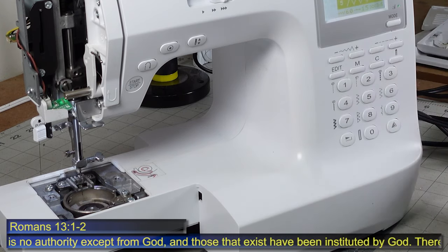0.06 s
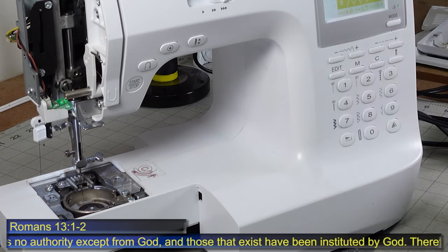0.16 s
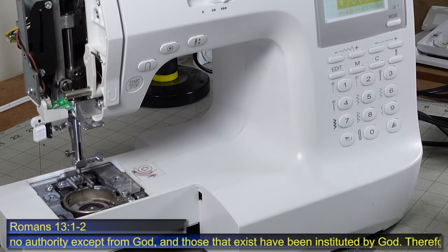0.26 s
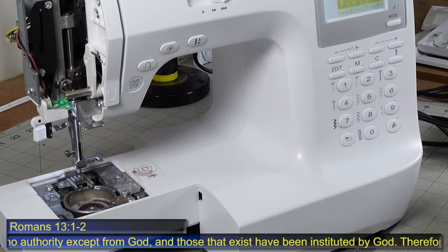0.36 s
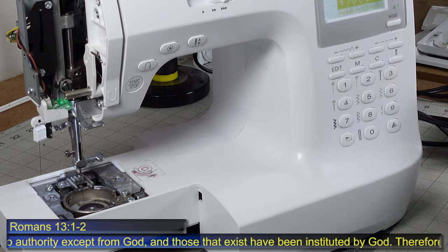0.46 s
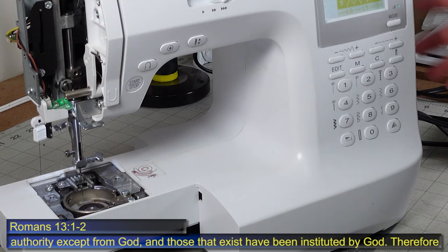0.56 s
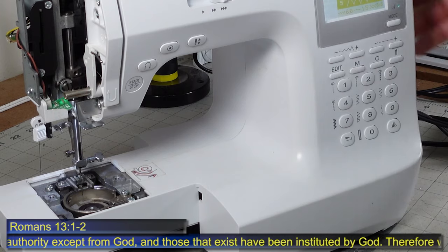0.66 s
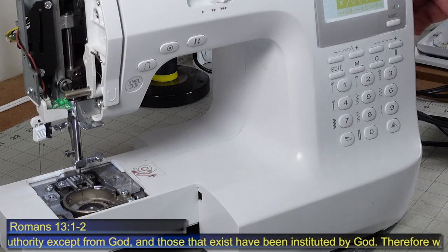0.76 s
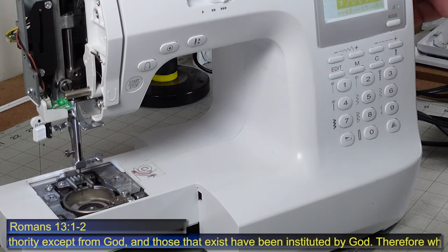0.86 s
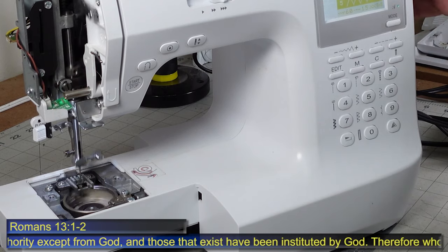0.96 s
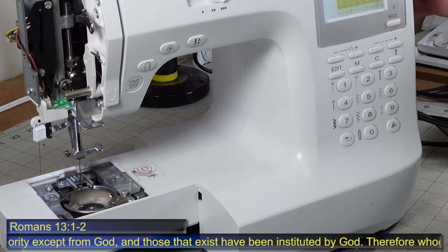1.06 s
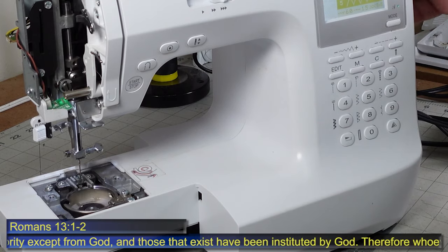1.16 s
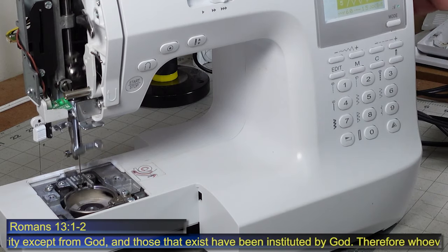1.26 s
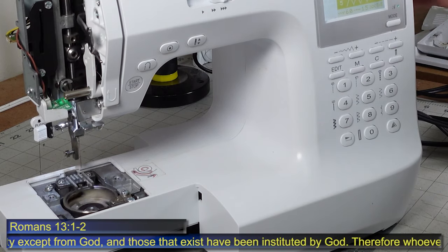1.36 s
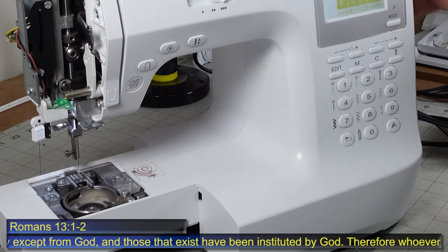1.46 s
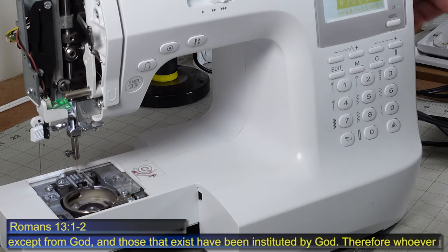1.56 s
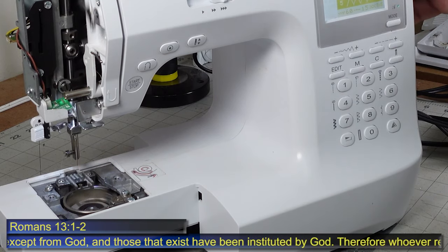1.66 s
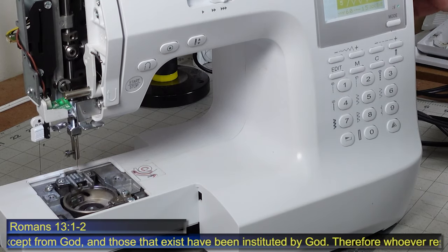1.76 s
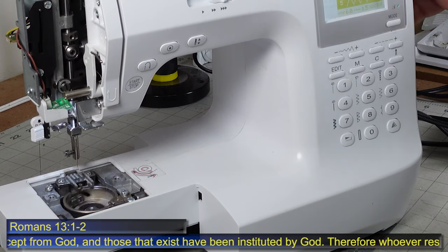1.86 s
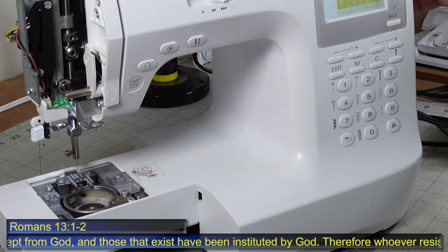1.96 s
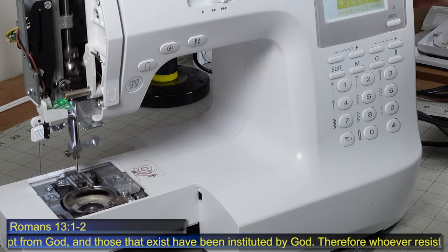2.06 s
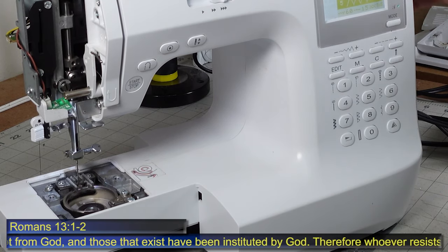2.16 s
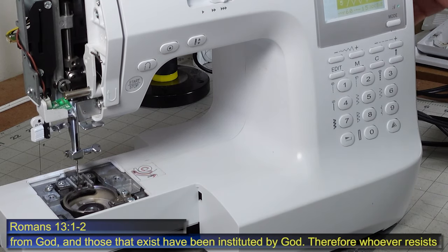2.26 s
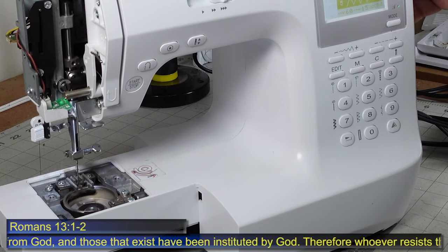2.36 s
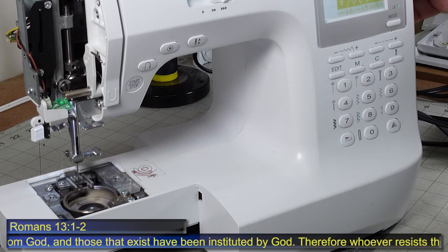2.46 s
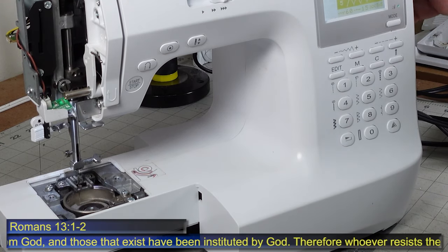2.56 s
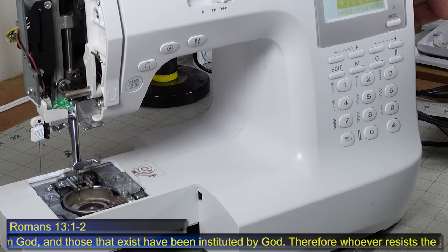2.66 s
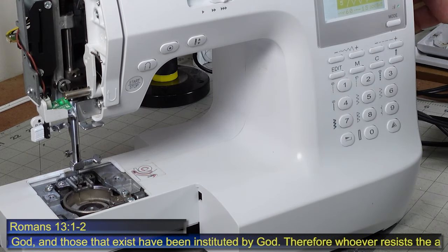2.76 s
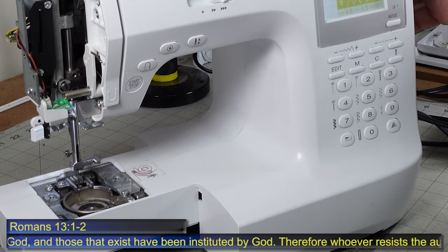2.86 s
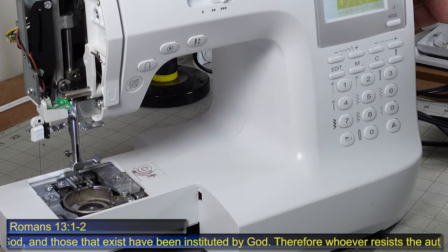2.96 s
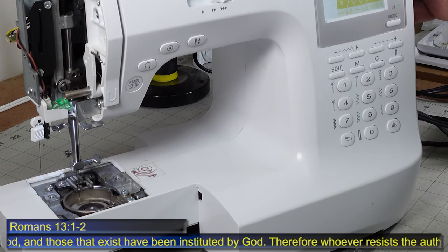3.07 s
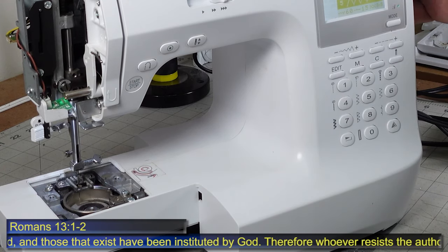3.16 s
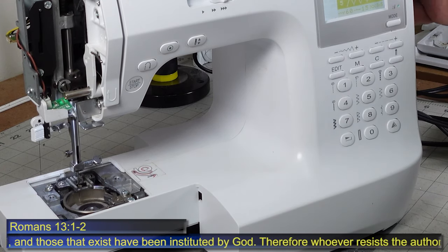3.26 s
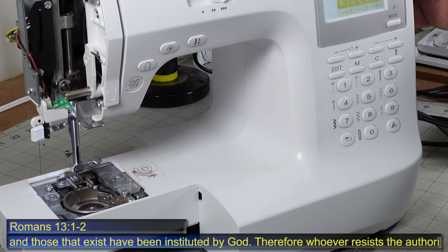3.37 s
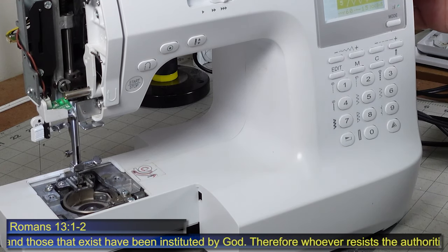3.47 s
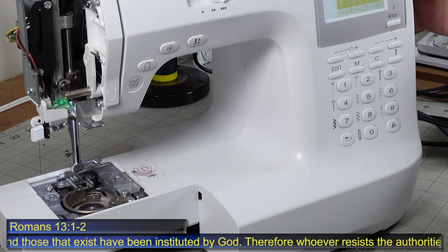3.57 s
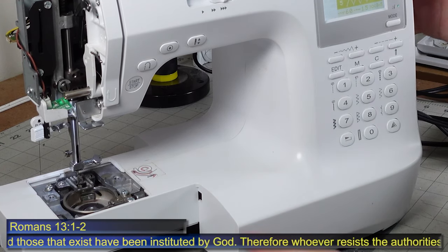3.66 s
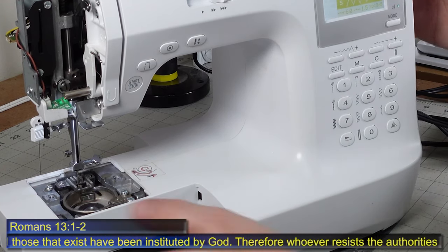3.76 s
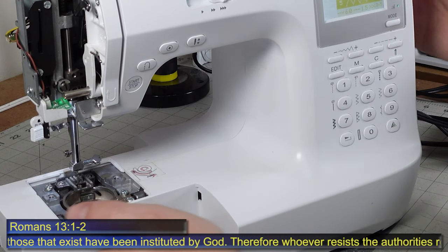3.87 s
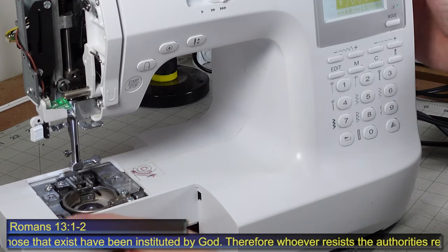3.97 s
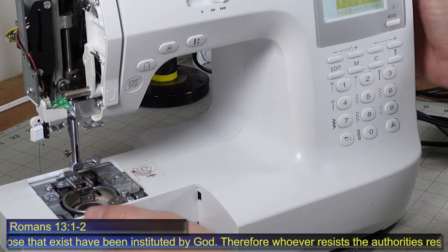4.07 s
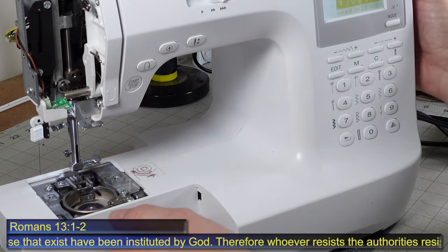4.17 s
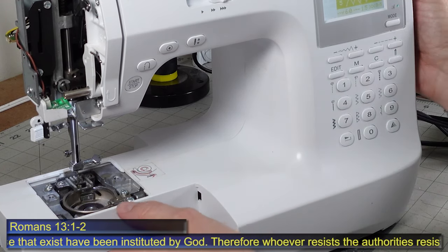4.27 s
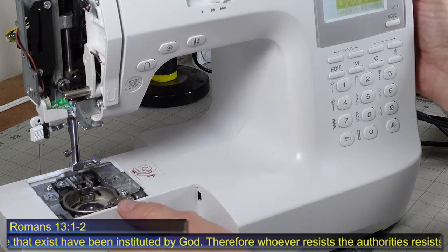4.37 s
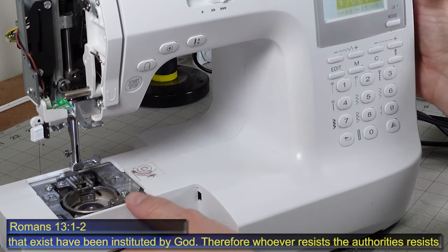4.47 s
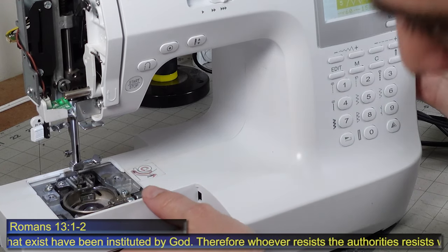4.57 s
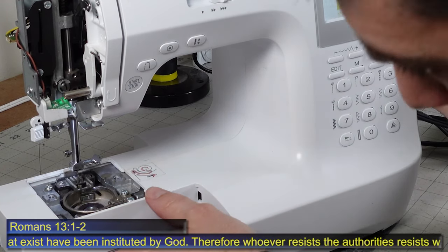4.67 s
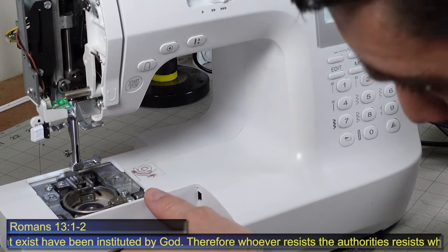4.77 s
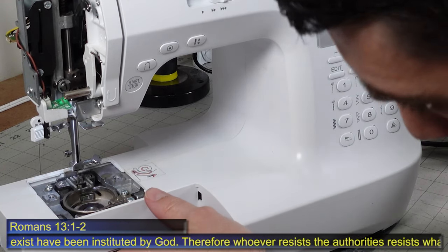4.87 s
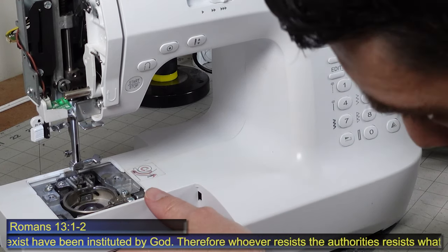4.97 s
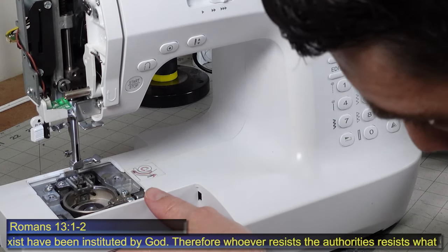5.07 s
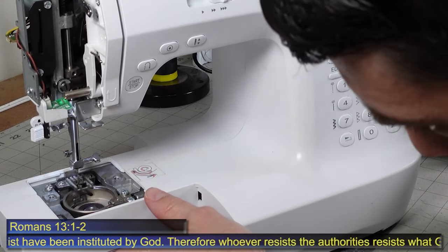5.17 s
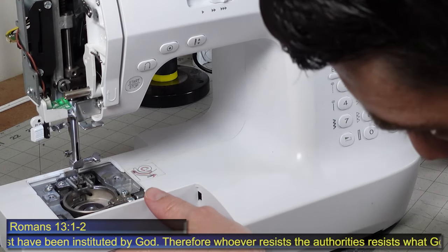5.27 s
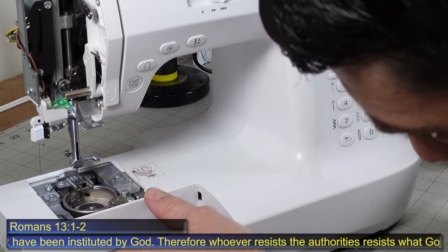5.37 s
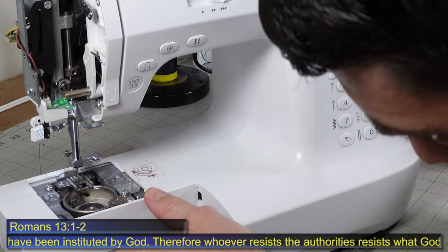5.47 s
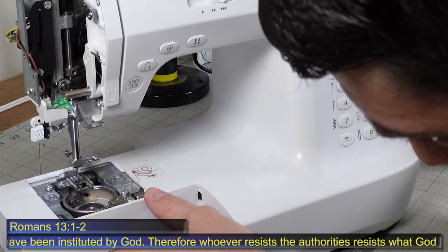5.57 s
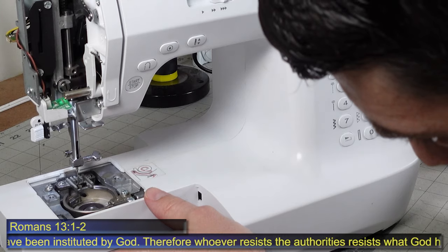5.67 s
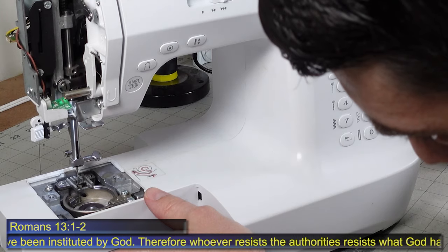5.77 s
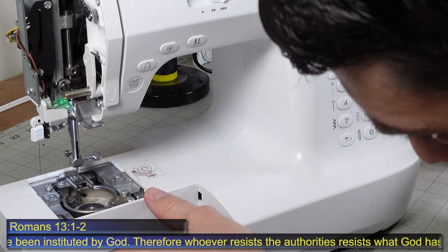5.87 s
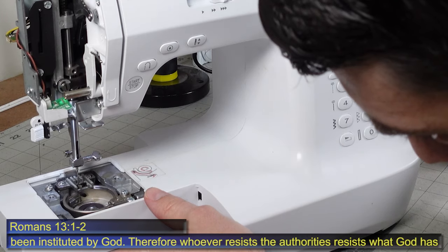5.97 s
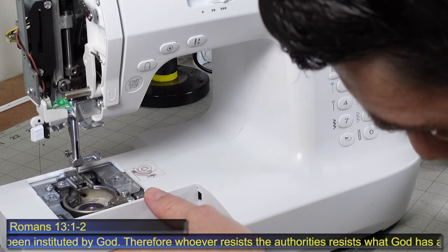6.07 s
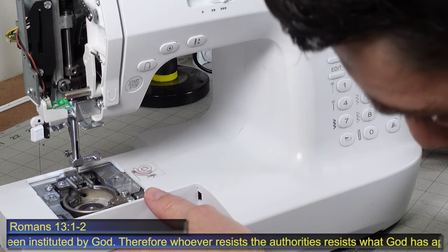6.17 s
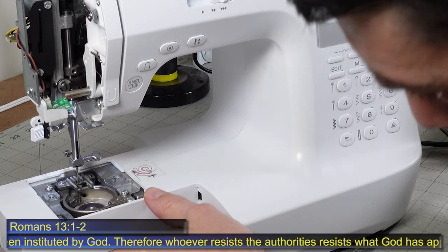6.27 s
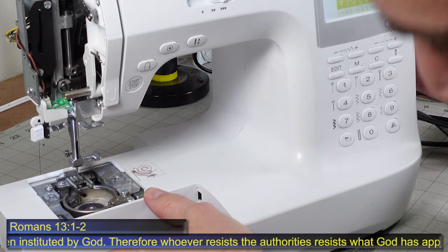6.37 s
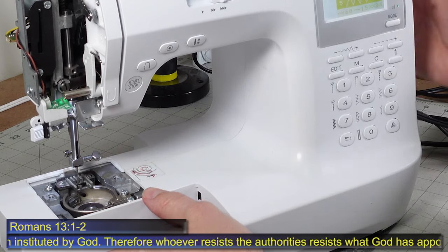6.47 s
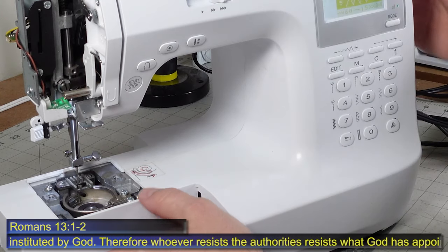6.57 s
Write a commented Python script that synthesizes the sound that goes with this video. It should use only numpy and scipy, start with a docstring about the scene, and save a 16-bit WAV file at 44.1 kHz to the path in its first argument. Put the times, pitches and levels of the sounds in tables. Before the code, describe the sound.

One close microphone, little room sound. Small metal parts click and rattle as shafts and gears are pushed round in jerks, the plastic casing resonating and the bench thumping softly. A sharp double click stands out midway. Later the handling turns to sparse dull knocks, cloth rustle and a short dry creak. Quiet room air and a faint low hum remain, ended by a blunt knock.

```python
"""Hand-turned sewing machine

A quiet workshop, one close microphone with little room in it: the handwheel of an open machine is turned by hand.
Grains of friction set the hollow casing, shafts and teeth ringing; a lever scrapes along its cam.
Clicks, knocks, ticks and a creaking joint are struck modes and dying noise, over friction in the bench.
Shaped noise makes a sleeve's rustle and the room air; sines make faint electric tones and a far low hum."""
import sys
import numpy as np
from scipy import signal
from scipy.io import wavfile

SR = 44100
rng = np.random.default_rng(int(sys.argv[2]) if len(sys.argv) > 2 else 0)


def log_audio(samples):
    """Write samples as a 16-bit WAV file to the path given in sys.argv[1]."""
    # one column per channel
    frames = np.atleast_2d(samples).T
    # limit to full scale, then quantise
    limited = np.clip(frames, -1, 1)
    pcm = np.round(limited * 32767).astype(np.int16)
    wavfile.write(sys.argv[1], SR, pcm)


def linear_from_db(decibels):
    """Turn decibels (scalar or array-like) into linear amplitude factors; 0 gives 1."""
    return 10 ** (np.asarray(decibels, float) / 20)


N = 291291

# Pushes on the wheel and jolts of the hand; the bench answers them too:
# (time of full force [s], hold [s], casing drone level [dB], shaft rub level [dB])
PUSHES = [(0.757, 0.023, -70, -75), (0.94, 0.0027, -50.5, -66), (1.015, 0.066, -49.5, -68),
          (1.082, 0.0042, -43, -60), (1.13, 0.0073, -47, -56.5), (1.308, 0.083, -45, -58),
          (1.41, 0.041, -43, -63), (1.486, 0.0044, -34, -49), (1.538, 0.053, -47, -57.5),
          (1.615, 0.0046, -42.5, -55.5), (1.691, 0.0092, -39.5, -56), (1.724, 0.0056, -43.5, -45.5),
          (1.781, 0.054, -47.5, -69), (1.85, 0.033, -45, -67), (2.042, .01, -54, -62),
          (2.063, 0.0054, -43, -56), (2.118, 0.076, -49.5, -60.5), (2.199, 0.0046, -49.5, -55),
          (2.491, 0.029, -51, -62), (2.577, 0.0087, -39, -48.5), (2.678, 0.018, -59, -62.5),
          (3.014, 0.0035, -67.5, -71), (3.182, .005, -55, -65.5), (3.361, 0.12, -58.5, -70),
          (3.5, 0.098, -60, -74), (3.628, .003, -45, -61), (3.723, 0.017, -54, -66),
          (3.852, 0.014, -56, -74), (4.031, 0.0044, -46, -48.5), (4.054, 0.072, -64.5, -64.5),
          (4.317, 0.08, -58, -72), (4.516, 0.0041, -68, -62), (4.524, 0.035, -59, -68),
          (4.612, .005, -38.5, -45.5), (4.694, 0.0041, -44.5, -53.5), (4.77, 0.15, -69, -75),
          (4.964, 0.0093, -54, -64), (6.44, 0.0029, -44.5, -48), (6.467, 0.009, -55.5, -67),
          (6.582, .02, -61, -72)]
# Resonances of the hollow casing: (frequency [Hz], width [Hz], level [dB])
CASING_MODES = [(247.5, 30, -9), (303.8, 18.8, 2), (341, 27, -0.5), (419.3, 52.5, -6)]
# Resonances of shafts and gears: (frequency [Hz], width [Hz], level [dB])
SHAFT_MODES = [(682, 75, 10.5), (930, 150, -1.5), (1005, 123, 4.5), (1520, 530, -10), (1710, 44, -28),
               (2900, 1350, -15), (3800, 780, -15.5)]


def wheel():
    """Every push makes shafts and gears rub, and sets the hollow casing droning."""
    s, hold, drone_db, rub_db = np.transpose(PUSHES)
    drone_level_db = surges(s, hold, drone_db, rise=904, fall=326)
    rub_level_db = surges(s, hold, rub_db, rise=910, fall=415)
    drone = friction(drone_level_db, CASING_MODES, per_s=800, spread_db=2.0, soft_hz=492)
    rub = friction(rub_level_db, SHAFT_MODES, per_s=2000, spread_db=5.0, soft_hz=5600)
    return drone + rub


# The lever's one scrape: (time [s], level [dB])
SCRAPE_LEVEL = [(1.7, -65), (1.716, -69), (1.722, -51), (1.798, -50.5), (1.82, -61.5), (1.86, -79)]
# Resonances of lever and cam: (frequency [Hz], width [Hz], level [dB])
CAM_MODES = [(900, 62, 10), (1110, 100, 6), (1608, 37, 6), (1900, 68, 3), (2320, 460, -6.5),
             (2780, 170, -7), (3320, 630, -12), (4300, 160, -9), (4740, 300, -15), (6000, 940, -13.5),
             (7960, 3200, -20.5), (12800, 4000, -26)]


def lever_scrape():
    """A lever dragged along its cam rings the metal with dense grains of friction."""
    level_db = in_time(SCRAPE_LEVEL, outside=-120)[0]
    return friction(level_db, CAM_MODES, per_s=1200, spread_db=-1.5, soft_hz=17000)


# A toothed part rasps, then is touched once more:
# (time [s], length [s], level of the lower ring [dB], brightness added above it [dB])
RASPS = [(1.435, 0.18, -46, -0.2), (1.687, 0.0033, -46, -4)]
# Lower ring of the toothed part: (frequency [Hz], width [Hz], level [dB])
TEETH_LOWER = [(1036, 73, 0.5), (1966, 76, -5.5), (2540, 400, -16), (3280, 33, 0.5), (3497, 99, -0.5),
               (3627, 115, 0.5)]
# Upper ring of the toothed part: (frequency [Hz], width [Hz], level [dB])
TEETH_UPPER = [(4400, 870, -17), (4950, 100, 2), (5250, 230, 1), (6200, 200, -5), (6930, 380, -5),
               (7730, 420, -10.5)]
# Loose parts shaken by the rasp: (frequency [Hz], width [Hz], level [dB])
RATTLE_MODES = [(1500, 1000, 1.5), (2800, 1200, -4), (4400, 1800, -0.5), (5950, 2000, -1)]


def rasp():
    """Unevenly passing teeth press the rubbing harder in turn, and the rasp brightens as it goes."""
    rise, fall, brighten = 4994, 1097, 37  # dB per s
    grains_per_s = 4400
    s, length, db, bright_db = np.transpose(RASPS)
    lower_db = surges(s, length, db, rise, fall)
    brighter = []
    for start, lasts, level_db in zip(s, length, db + bright_db):
        elapsed = np.clip(np.arange(N) / SR - start, 0, lasts)
        brighter.append(surges(start, lasts, level_db, rise, fall) + brighten * elapsed)
    upper_db = np.max(brighter, axis=0)

    teeth_per_s = 140 * (1 + 0.255 * drift(38.5))
    press_db = 3.5 * np.cos(2 * np.pi * np.cumsum(teeth_per_s / SR))
    out = friction(lower_db + press_db, TEETH_LOWER, grains_per_s, spread_db=1.5, soft_hz=5960)
    out += friction(upper_db - 9 + press_db, TEETH_UPPER, grains_per_s, spread_db=2.5, soft_hz=9000)
    out += friction(lower_db - 10 + press_db, RATTLE_MODES, per_s=2500, spread_db=2.0, soft_hz=9000)
    hiss_modes = [(8700, 2100, 0.5), (12400, 3700, 0)]
    return out + friction(upper_db - 18 + .5 * press_db, hiss_modes, grains_per_s, spread_db=2.5, soft_hz=18000)


# Bright clicks of small metal parts, before the shares of ring, crack and rattle:
# (time [s], level at own pitch [dB], pitch [Hz], level at 1 kHz relative to that [dB], rattle t60 [s])
# The rattle holds its t60 within 0.01 to 0.4 s.
CLICKS = [(0.7585, -51.5, 10900, -5, 0.35), (1.039, -53.5, 4400, 8.5, 0.21),
          (1.0771, -37, 12100, -16, 0.19), (1.1217, -37.5, 9000, -18, 0.19), (1.3265, -33, 10800, -7, 0.27),
          (1.6869, -45, 3550, -4, 0.36), (1.8074, -39.5, 12400, -13, 0.12), (1.833, -37, 13300, -11, 0.16),
          (1.864, -35.5, 13300, -11.5, 0.15), (2.0466, -40, 12600, -6.5, 0.41),
          (2.0587, -35.5, 3350, -4, 0.12), (2.177, -50, 2980, 5, 0.071), (2.186, -42, 4900, -6, 0.12),
          (2.229, -63, 1500, 1, 0.08), (2.5615, -36, 6000, -13, 0.1), (2.5652, -23.5, 5570, -23, 0.067),
          (2.5704, -22.5, 13800, -11, 0.23), (3.0036, -54.5, 5470, -1, 0.075),
          (3.499, -56.5, 10500, 5.5, 0.042), (3.5977, -46.5, 14200, -12, 0.43),
          (3.626, -50, 9160, -12, 0.11), (3.729, -46.5, 13200, -18, 0.17), (4.3824, -48, 3720, -8, 0.044),
          (4.505, -39, 2590, 0, 0.091), (6.574, -52.5, 8040, 4, 0.11)]


def clicks(skirt_db=-11.5, width=1.134, rise_db=1.5):
    """A small part stands out at its own pitch, with a lower skirt that rises slightly per octave above it."""
    rows = []
    for s, db, hz, low_db, t60 in CLICKS:
        points = {300: low_db - 5.5, 1000: low_db, hz / width: skirt_db, hz: 0, hz * width: skirt_db}
        points[22000] = skirt_db + rise_db * np.log2(22000 / hz / width)
        if hz > 3500 * width ** 2:
            points[3500] = -14.5  # middle of the spectrum under a high pitch
        colour_hz = sorted(points)
        rows.append((s, colour_hz, [db + points[f] for f in colour_hz], t60))
    return blows(rows, ring_db=-24.5, crack_db=-11.0, crack_t60=0.029, rattle_db=-19.5, low_stretch=0.013)


def pings(ping_db=-26.0, spread=.07, lasting=0.45):
    """The part that clicks also rings briefly as a cluster of close modes around its pitch."""
    out, t = np.zeros(N), np.arange(SR // 5) / SR
    soft_start = 1 - np.exp(-t / 0.00022)
    for (s, db, hz, _, t60), offsets in zip(CLICKS, rng.normal(0, 1, (len(CLICKS), 9))):
        cluster = [(hz * (1 + spread * offset), 0, lasting * t60) for offset in offsets]
        add(out, s, ring(cluster, db + ping_db, t) * soft_start)
    return out


# Dull knocks on casing and bench, before the shares of ring, crack and rattle:
# (time [s], level at 1 kHz [dB], at 3.5 kHz relative to it [dB], at 10 kHz likewise [dB], rattle t60 [s])
# The rattle holds its t60 within 0.01 to 0.4 s.
KNOCKS = [(0.941, -43.5, -19, -32, 0.2), (1.299, -45.5, -14, -9, 0.46), (1.723, -39.5, -35, -9, 0.19),
          (2.036, -48, -14, -12, 0.11), (2.492, -55.5, -17, -9, 0.15), (2.684, -49, -21, -10, 0.074),
          (3.182, -61, -8, -3, 0.082), (3.363, -53, -42, -24, 0.054), (3.419, -54, -11, -25, 0.092),
          (3.45, -50.5, -22, -12, 0.056), (3.523, -59, -7, -27, 0.053), (3.566, -51, -33, -18, 0.052),
          (3.858, -55.5, -18, -14, 0.1), (4.017, -32, -8.5, -5, 0.056), (4.17, -54.5, -14, -1, 0.12),
          (4.295, -52.5, -21, 0, 0.18), (4.444, -50.5, 1.5, -20, 0.072), (4.469, -58, -9, -12, 0.08),
          (4.609, -39, -9, -25, 0.082), (4.617, -35.5, -15, -23, 0.13), (4.693, -36.5, -13, -29, 0.076),
          (4.966, -58.5, -1.5, -13, 0.085), (6.4271, -34, -12, -24, 0.035), (6.431, -34, -43, -15, 0.082)]


def knocks():
    """Blunt blows, each coloured by its own levels in four places from thud to tick."""
    rows = []
    for s, db, click_db, tick_db, t60 in KNOCKS:
        colour_db = db + np.array([-6, 0, click_db, tick_db])
        rows.append((s, [280, 1000, 3500, 10000], colour_db, t60))
    return blows(rows, ring_db=-18.0, crack_db=-9.5, crack_t60=0.015, rattle_db=-19.5, low_stretch=0.42)


# Modes of the frame that clicks and knocks ring: (frequency [Hz], level [dB], t60 [s])
FRAME_MODES = [(231.6, 6.5, 0.37), (324, 14.5, 0.073), (413, 15.5, 0.064), (603, 12.5, 0.037),
               (640, 2, 0.13), (913, -11, 0.064), (1060, -17, 0.049), (1174, -2, 0.11), (1653, 13.5, 0.027),
               (2240, -26, 0.035), (2733, 2.5, 0.039), (3260, 10.5, 0.027), (3920, 2, 0.036),
               (4150, 8, 0.025), (5400, -2, 0.04), (7200, -1, 0.052), (9220, 2, 0.048),
               (10530, -1.5, 0.052), (13300, -23, 0.043)]


def blows(rows, ring_db, crack_db, crack_t60, rattle_db, low_stretch):
    """Each blow rings the frame, cracks, and leaves a rattle of loose parts whose lows die last."""
    out, t = np.zeros(N), np.arange(SR // 3) / SR
    hz, noise = zip(*[pair for pair in noise_bands(count=36) if pair[0] > 150])
    hz = np.array(hz)[:, None]
    noise = np.pad(noise, ((0, 0), (0, len(t))))
    rise = 1 - np.exp(-t / (1.46 / hz + 0.00062))  # contact takes a moment, longer in the lows
    stretch = (3500 / hz) ** low_stretch
    mode_hz = np.array(FRAME_MODES)[:, :1]
    chance_db = rng.normal(0, 3.0, (len(rows), len(FRAME_MODES), 1))
    for (s, colour_hz, colour_db, t60), luck_db in zip(rows, chance_db):
        def colour(f):
            return np.interp(np.log(f), np.log(colour_hz), colour_db)

        add(out, s, ring(FRAME_MODES, colour(mode_hz) + luck_db + ring_db, t))
        crack = linear_from_db(crack_db - 60 * t / (crack_t60 * stretch))
        rattle = linear_from_db(rattle_db - 60 * t / (np.clip(t60, .01, .4) * stretch))
        at = round(s * SR)
        bands = linear_from_db(colour(hz)) * (crack + rattle) * rise * noise[:, at:at + len(t)]
        add(out, s, np.sum(bands, axis=0))
    return out


# Single slips of the creaking joint, before chance in each mode: (time [s], level [dB])
SLIPS = [(4.586, -43), (4.592, -41), (4.598, -42), (4.604, -40), (4.657, -49), (4.685, -41), (4.703, -49),
         (4.74, -43), (4.755, -59), (4.767, -41), (4.773, -42), (4.786, -45), (4.808, -43.5),
         (4.827, -41.5), (4.845, -45), (4.891, -50), (4.937, -45)]
# Short modes of the joint: (frequency [Hz], level [dB], t60 [s])
JOINT_MODES = [(798, -3, 0.022), (875, -0.5, 0.015), (1610, -13, 0.017), (2500, -18, 0.012),
               (3150, -17.5, 0.013), (3440, -14, 0.012)]


def creak():
    """Every slip of the joint rings the same short modes after a soft start."""
    out, t = np.zeros(N), np.arange(SR // 20) / SR
    # a run of further slips among them, on the whole slowing down
    gaps_s = .007 * 1.06 ** np.arange(13) * rng.uniform(.7, 1.0, size=13)
    run_s = 4.63 + np.cumsum(gaps_s) - gaps_s[0]
    slips = list(SLIPS) + [(s, -44.5) for s in run_s]
    soft_start = 1 - np.exp(-t / 0.0019)
    for (s, db), luck_db in zip(slips, rng.normal(0, 4.6, (len(slips), len(JOINT_MODES), 1))):
        add(out, s, ring(JOINT_MODES, db + luck_db, t) * soft_start)
    return out


# Dry ticks of a tiny part: (time [s], level [dB], pitch [Hz])
TICKS = [(3.418, -52, 3280), (3.525, -58, 3300), (4.0855, -49.5, 2800), (4.434, -39.5, 4700),
         (6.413, -58, 5000)]


def ticks():
    """A tiny part rings at its own pitch and has died by 60 dB after 24 cycles."""
    out, t = np.zeros(N), np.arange(SR // 20) / SR
    for s, db, hz in TICKS:
        add(out, s, ring([(hz, db, 24 / hz)], 0, t) * (1 - np.exp(-t * hz)))
    return out


def room(x):
    """Ten feedback delays between the walls, duller on every round."""
    t60_s, wall_cut_hz = 0.18, 12000
    out, dull = np.zeros(N), np.exp(-2 * np.pi * wall_cut_hz / SR)
    for k, lag in enumerate((rng.uniform(0.0081, .035, 10) * SR).astype(int)):
        loop, gain, state = x.copy(), linear_from_db(-60 * lag / SR / t60_s), [0.]
        for i in range(lag, N, lag):
            back, state = signal.lfilter([gain * (1 - dull)], [1, -dull], loop[i - lag:i], zi=state)
            loop[i:i + lag] += back[:N - i]
        out += (loop - x) * (-1) ** k
    return out


# Weight of arms and body on the bench: (time [s], level [dB])
LEAN = [(0, -83), (2.8, -72.5), (3.2, -75.5), (3.55, -63), (3.9, -62), (4.15, -66.5), (4.45, -63),
        (4.85, -60), (5.1, -71), (5.6, -68), (6.3, -73), (6.6, -58.5)]
# Low resonances of the bench: (frequency [Hz], width [Hz], level [dB])
BENCH_MODES = [(62.2, 27, 0.5), (82.2, 36.4, 4.5), (122.3, 21, 3), (140.4, 21, -1.5)]
# The hand thumps the machine against the bench, before chance in each mode: (time [s], level [dB])
THUMPS = [(1.109, -54), (1.325, -56), (1.454, -44), (1.70, -57), (1.994, -53.5), (2.193, -56),
          (2.576, -44.5), (4.021, -50), (4.524, -65)]
# Bench modes rung by a thump: (frequency [Hz], level [dB], t60 [s])
THUMP_MODES = [(68, -3, 0.22), (83.7, 7, 0.15), (139, -9, 0.15)]


def bench():
    """The bench rumbles with every push and under the leaning weight; thumps ring its low modes."""
    s, hold, drone_db, _ = np.transpose(PUSHES)
    push_db = surges(s, hold, drone_db - 14.5, rise=450, fall=240)
    lean_db = in_time(LEAN)[0] + 2 * drift(9.4)
    out = friction(np.maximum(push_db, lean_db), BENCH_MODES, per_s=530, spread_db=2.0, soft_hz=172)
    t = np.arange(SR // 4) / SR
    soft_start = 1 - np.exp(-t / 0.0057)
    for (s, db), luck_db in zip(THUMPS, rng.normal(0, 5.4, (len(THUMPS), len(THUMP_MODES), 1))):
        add(out, s, ring(THUMP_MODES, db + luck_db, t) * soft_start)
    return out


# Movement of the sleeve: (time [s], level [dB])
RUSTLE_LEVEL = [(0, -75), (2.9, -79.5), (3.58, -71.5), (3.84, -62), (4.21, -65), (4.55, -61), (4.67, -66.5),
                (5.16, -76.5), (5.72, -81), (6.26, -77), (6.4, -66.5), (6.6, -62.5)]
# Spectrum of rubbing cloth: (frequency [Hz], density [dB per Hz])
CLOTH_SPECTRUM = [(410, -33), (700, -8), (1100, -3), (1190, -7.5), (2670, -9), (3790, -10.5), (8920, -11),
                  (15600, -9.5)]


def sleeve():
    """Rubbing cloth is shaped noise that follows the movement."""
    return linear_from_db(in_time(RUSTLE_LEVEL)[0]) * coloured_noise(CLOTH_SPECTRUM, patchy_db=0.3)


# Spectrum of the room air: (frequency [Hz], density [dB per Hz])
AIR_SPECTRUM = [(12, -35), (20, 2), (83, 4), (162, -5), (208, 2.5), (307, -8), (466, -2), (582, -3.5),
                (814, -13), (1420, -19), (2220, -22.5), (2410, -24), (2850, -24), (14300, -28),
                (15600, -26.5)]


def room_air():
    """Faint noise, strongest in the lows, whose bands flicker slowly."""
    return linear_from_db(-66.5) * coloured_noise(AIR_SPECTRUM, patchy_db=1.5)


# Two electric tones that take turns: (time [s], upper level [dB], lower level [dB])
TONE_LEVELS = [(0, -74, -99), (2.5, -75.5, -93), (4.6, -75.5, -105), (4.85, -101, -72.5), (6.61, -106, -79)]
# Swell of the far hum: (time [s], level [dB])
FAR_HUM_LEVEL = [(5.05, -93), (5.28, -67), (5.56, -64.5), (5.65, -71), (5.87, -58), (6.3, -62), (6.42, -67),
                 (6.6, -79)]


def tones():
    """Electric tones whose levels waver, and a far hum that swells and drifts in pitch."""
    t = np.arange(N) / SR
    upper_db, lower_db = in_time(TONE_LEVELS)
    out = linear_from_db(upper_db + 2.0 * drift(5.7)) * np.sin(2 * np.pi * 537 * t)
    out += linear_from_db(lower_db + .8 * drift(3)) * np.sin(2 * np.pi * 471 * t)
    out += linear_from_db(-91 + 2.0 * drift(3.2)) * np.sin(2 * np.pi * 2463 * t)  # high whine
    hum_hz = 94.3 + 1.51 * drift(3.0)
    hum_db = in_time(FAR_HUM_LEVEL)[0] + 0.3 * drift(3.3)
    out += linear_from_db(hum_db) * np.sin(2 * np.pi * np.cumsum(hum_hz) / SR)
    return np.sqrt(2) * out  # levels are rms


def friction(level_db, peaks, per_s, spread_db, soft_hz):
    """Grains of rubbing ring resonances; pressure both drives the ringing and, let go, damps it."""
    rub = signal.sosfilt(signal.butter(2, soft_hz, fs=SR, output="sos"), grains(per_s, spread_db))
    half = linear_from_db(.5 * level_db)  # once before and once after the resonances
    return half * resonate(rub * half, peaks) / np.std(resonate(rub, peaks))


def grains(per_s, spread_db):
    """Random tiny contacts of uneven size, unit power."""
    sizes = linear_from_db(spread_db * np.minimum(rng.exponential(1, N), 4)) * rng.choice([-1, 1], N)
    return rms_one(sizes * (rng.random(N) < per_s / SR)) + 1e-18


def resonate(x, peaks):
    """Parallel resonances of alternating sign."""
    out = 0
    for k, (hz, width, db) in enumerate(peaks):
        r = np.exp(-np.pi * width / SR)
        a = [1, -2 * r * np.cos(2 * np.pi * hz / SR), r * r]
        out = out + (-1) ** k * linear_from_db(db) * (1 - r * r) / 2 * signal.lfilter([1, 0, -1], a, x)
    return out


def ring(modes, levels_db, t):
    """Struck modes, each dying away at its own rate."""
    hz, db, t60 = np.transpose(modes)[:, :, None]
    return np.sum(linear_from_db(db + levels_db - 60 * t / t60) * np.sin(2 * np.pi * hz * t), axis=0)


def surges(s, hold, db, rise, fall):
    """Level in dB of events that rise, hold and fall at set rates [dB per s], their powers added."""
    t = np.arange(0, N / SR + .002, .001)
    s, hold, db = (np.reshape(v, (-1, 1)) for v in (s, hold, db))
    each_db = db - rise * np.maximum(s - t, 0) - fall * np.maximum(t - s - np.abs(hold), 0)
    total_db = 10 * np.log10(np.sum(linear_from_db(2 * each_db), axis=0) + 1e-12)
    return np.interp(np.arange(N) / SR, t, total_db)


def coloured_noise(spectrum, patchy_db):
    """Bands of noise on a spectrum, each flickering a little; unit power."""
    hz_points, db_points = np.transpose(spectrum)
    out = 0
    for hz, band in noise_bands(count=22):
        band_db = np.interp(np.log(hz), np.log(hz_points), db_points) + patchy_db * drift(7.1)
        out = out + np.sqrt(hz) * linear_from_db(band_db) * band  # wider bands hold more power
    return rms_one(out)


def noise_bands(count):
    """Centre frequency and unit-power noise of bands from 20 Hz to 20 kHz."""
    edges, white = np.geomspace(20, 20000, count + 1), rng.standard_normal((2, N))
    for k, (low, high) in enumerate(zip(edges, edges[1:])):
        band = signal.sosfilt(signal.butter(2, [low, high], "band", fs=SR, output="sos"), white[k % 2])
        yield np.sqrt(low * high), rms_one(band)


def drift(rate):
    """Slow chance with spread 1: noise through two equal poles, worked out every 40 samples."""
    r = np.exp(-80 * np.pi * rate / SR)
    slow = signal.lfilter([1], [1, -2 * r, r * r], rng.standard_normal(N // 40 + 2002))[2000:]
    return np.interp(np.arange(N) / 40, np.arange(len(slow)), rms_one(slow))


def in_time(rows, outside=None):
    """Columns of a table at every sample."""
    s, *columns = np.transpose(rows)
    return [np.interp(np.arange(N) / SR, s, c, outside, outside) for c in columns]


def rms_one(x):
    """Scale to unit power."""
    return x / np.sqrt(np.mean(x ** 2) + 1e-20)


def add(out, s, sound):
    """Mix a sound in at a time."""
    at = round(s * SR)
    out[at:at + len(sound)] += sound[:N - at]


def scene():
    """Machine in its room, over bench rumble, rustle, air and tones; one channel."""
    machine = wheel() + lever_scrape() + rasp() + clicks() + pings() + knocks() + creak() + ticks()
    in_room = machine + linear_from_db(-21) * room(machine)
    return (in_room + bench() + sleeve() + room_air() + tones())[None]


def low_pass(x):
    """Removes everything above the highest recorded frequency."""
    return signal.sosfilt(signal.butter(12, 16650, fs=SR, output="sos"), x)


def record(dry):
    """A steep filter takes off the top, 60 dB down from 16.6 kHz."""
    mix = signal.sosfilt(signal.cheby2(14, 60, 16600, fs=SR, output="sos"), dry)
    return low_pass(mix)


dry = scene()
out = record(dry)
log_audio(out)
```